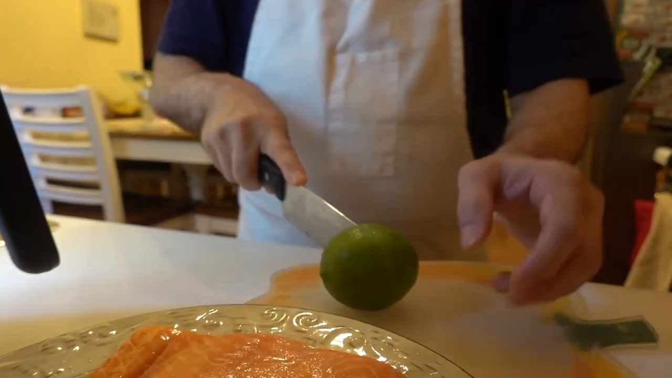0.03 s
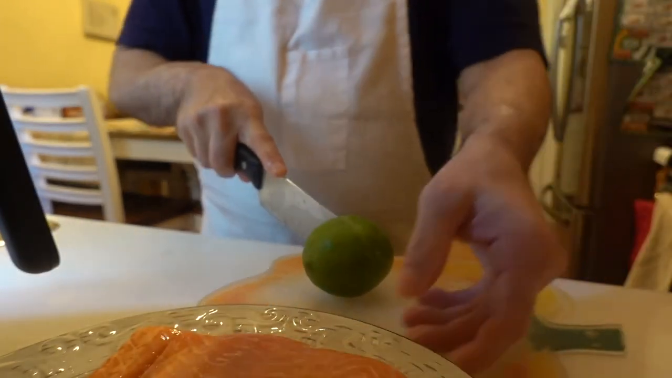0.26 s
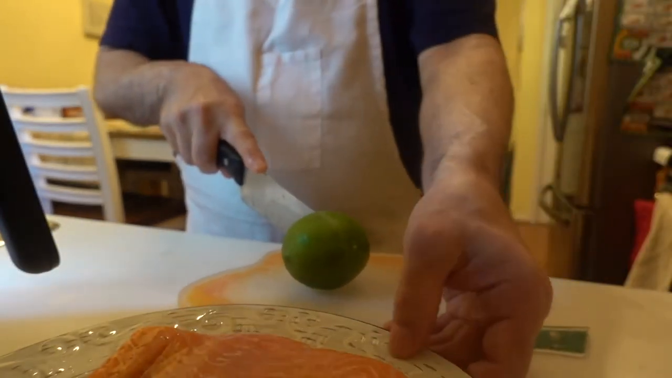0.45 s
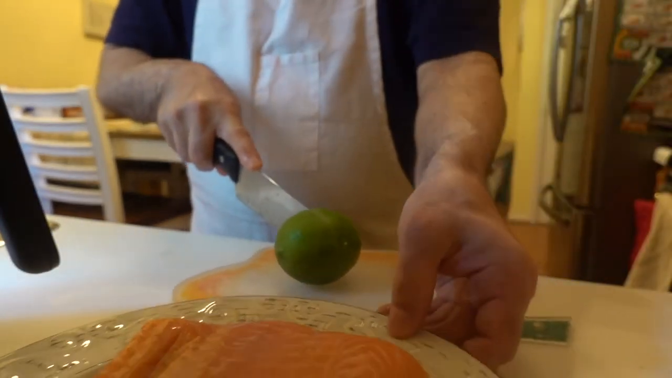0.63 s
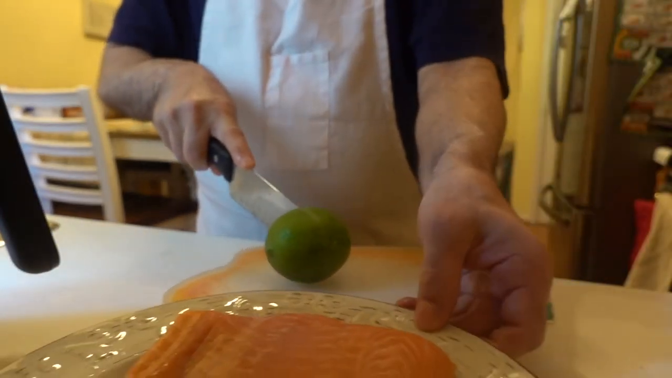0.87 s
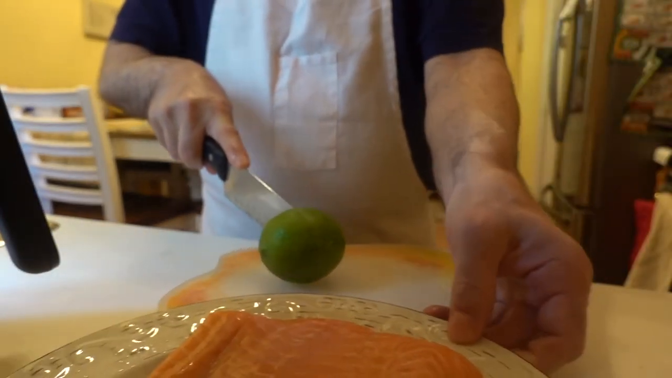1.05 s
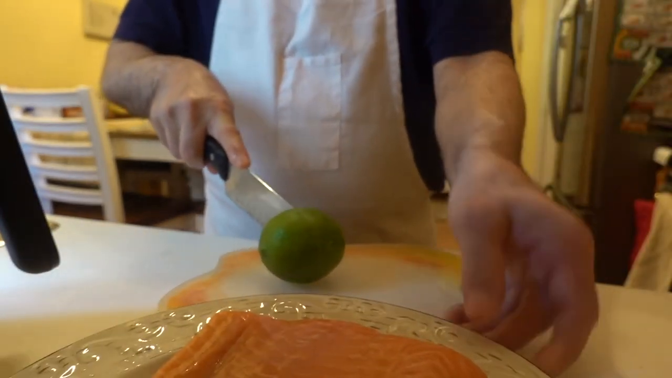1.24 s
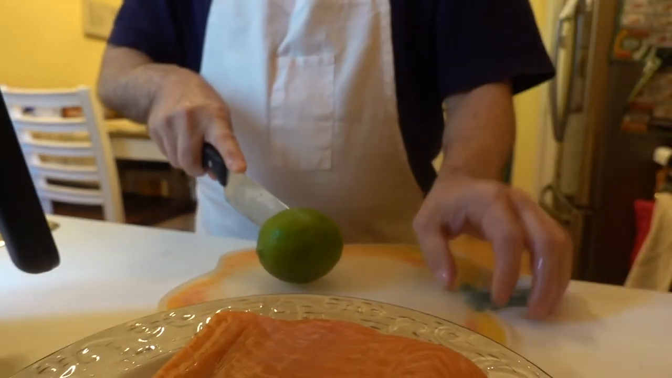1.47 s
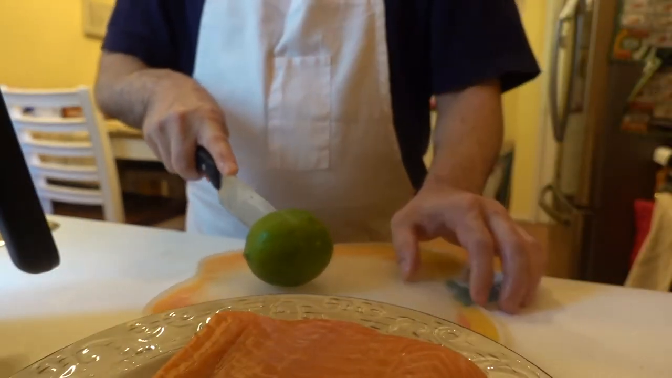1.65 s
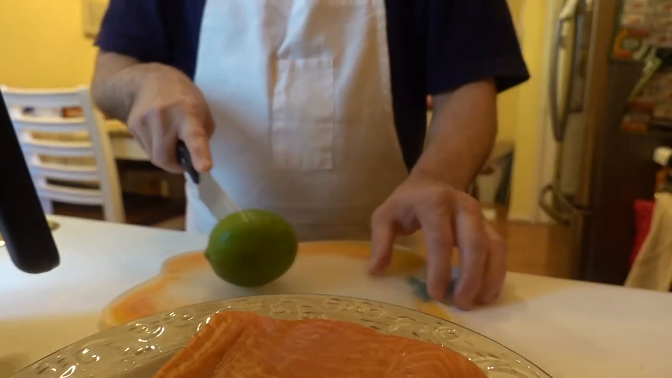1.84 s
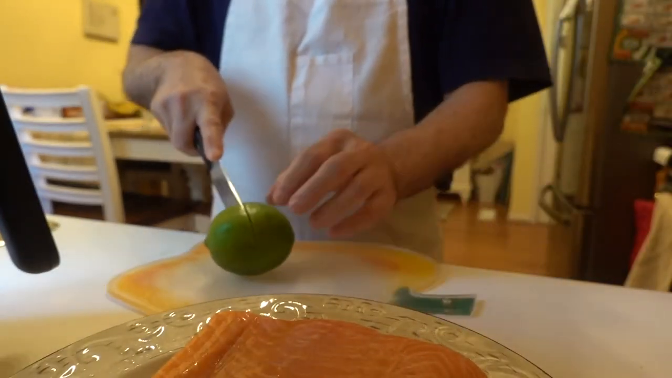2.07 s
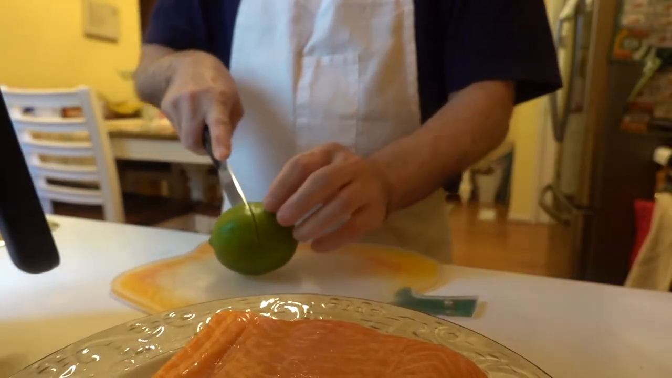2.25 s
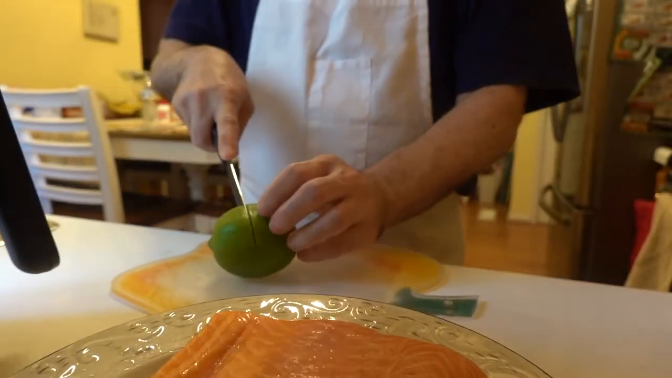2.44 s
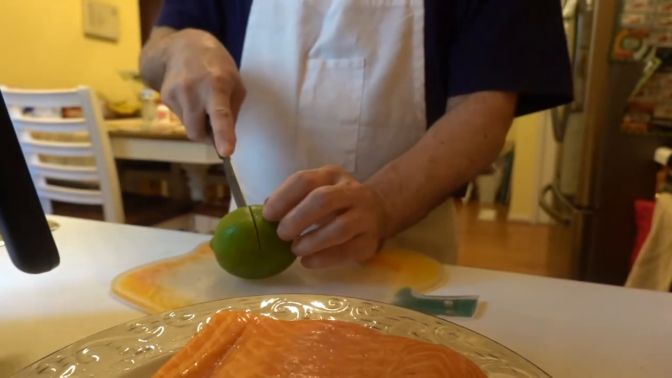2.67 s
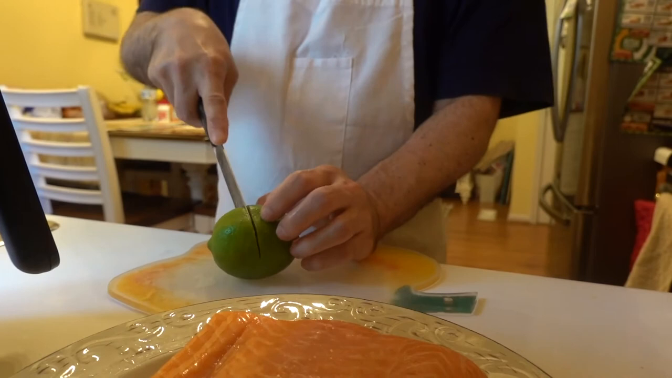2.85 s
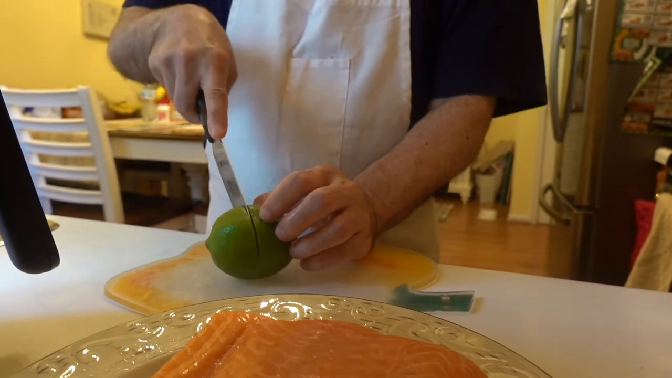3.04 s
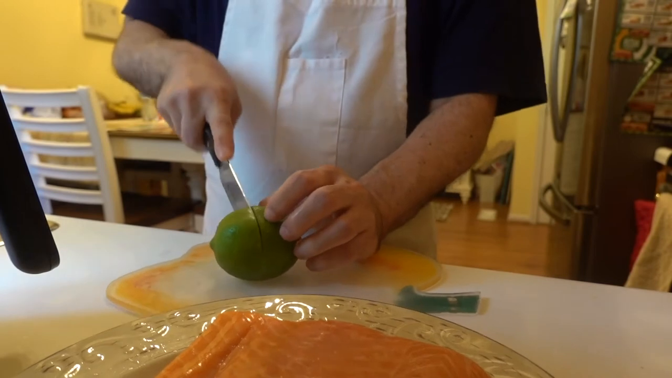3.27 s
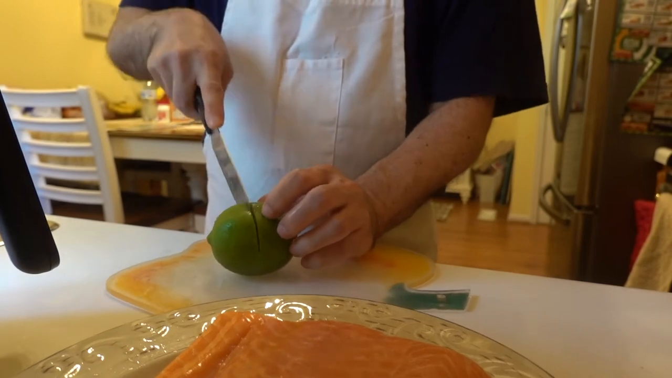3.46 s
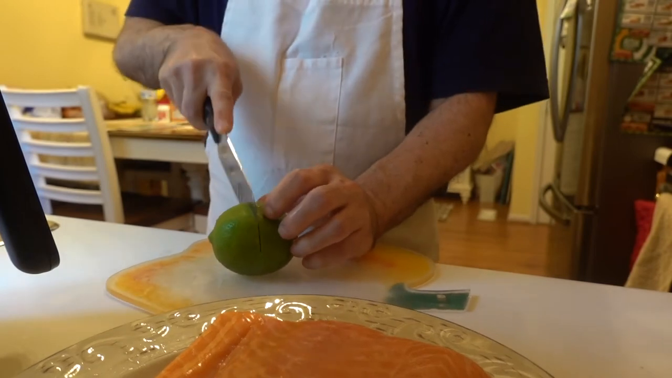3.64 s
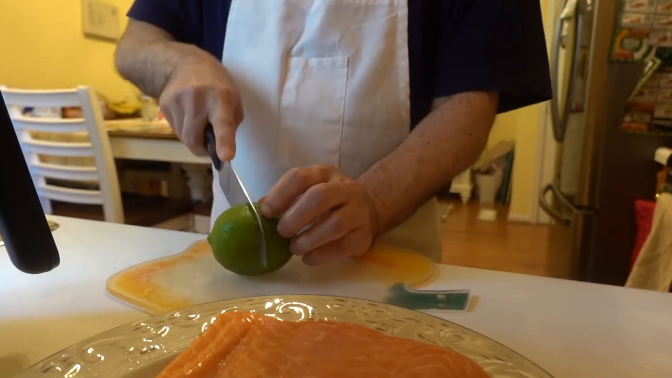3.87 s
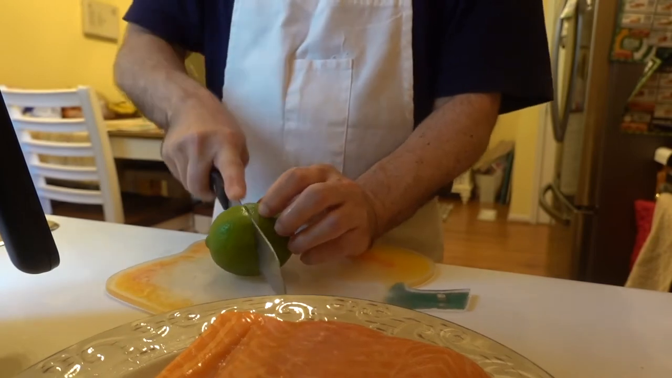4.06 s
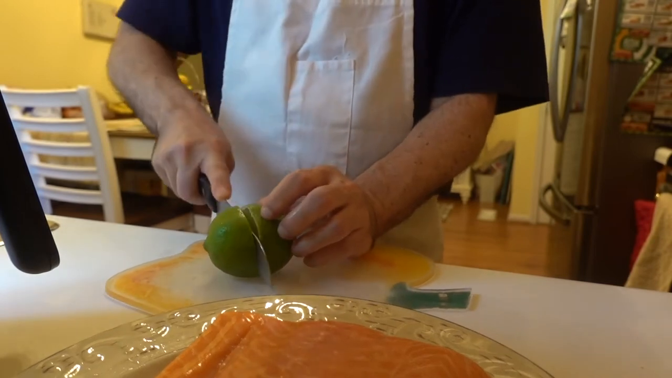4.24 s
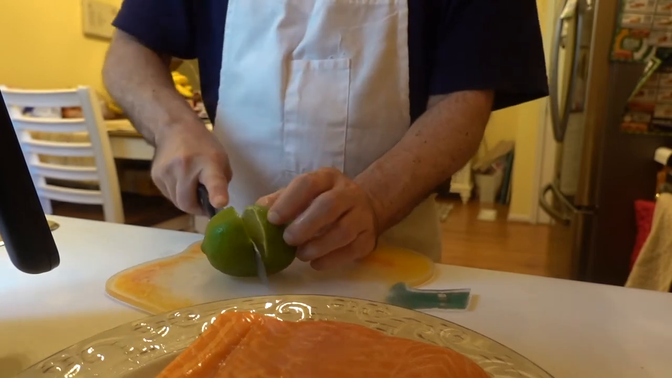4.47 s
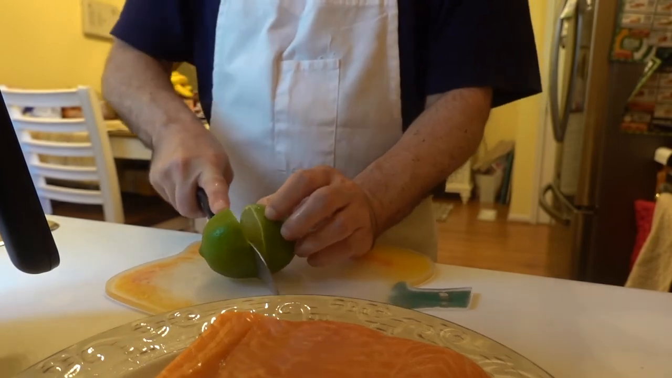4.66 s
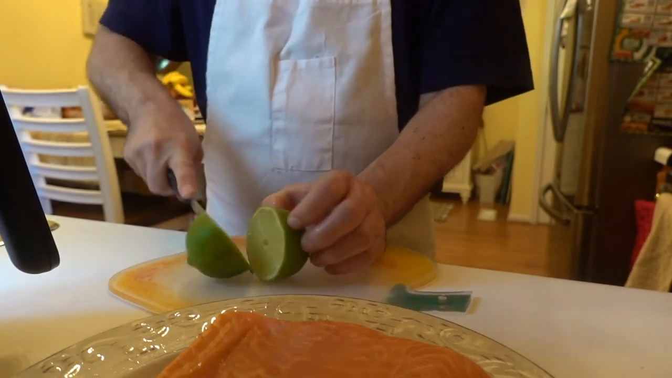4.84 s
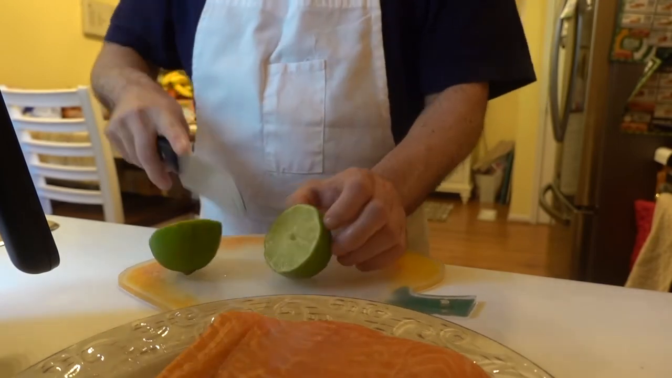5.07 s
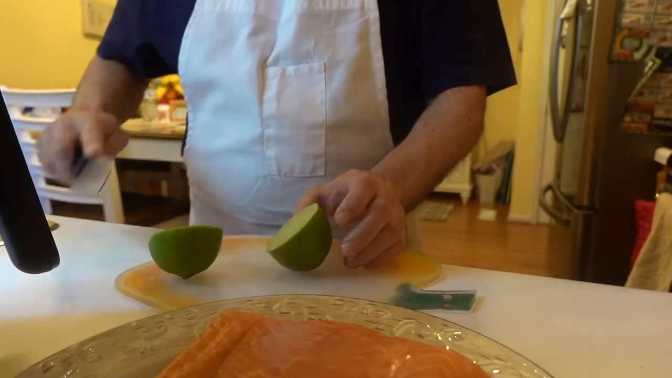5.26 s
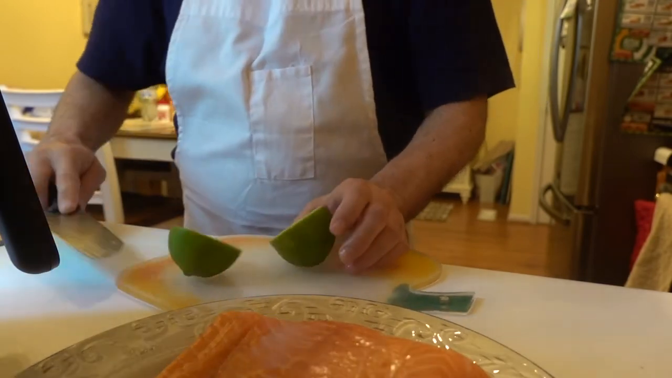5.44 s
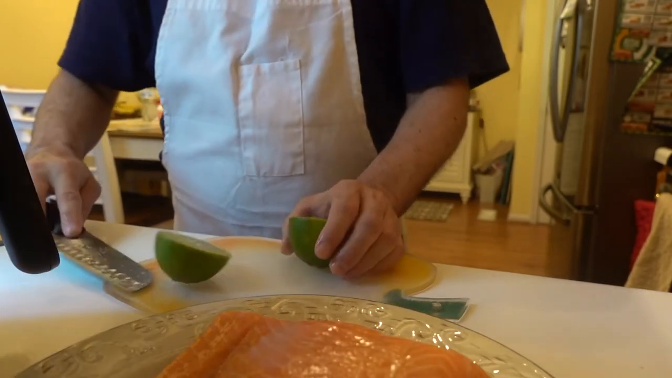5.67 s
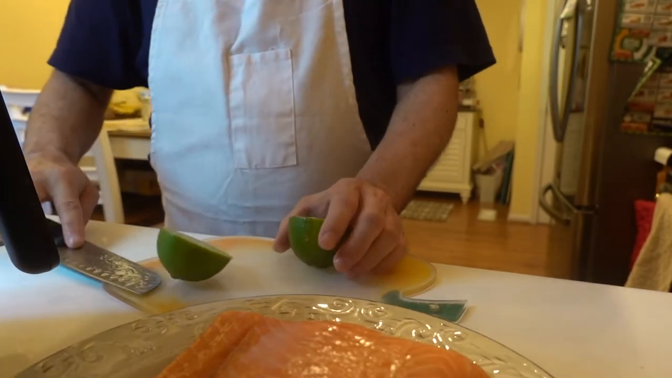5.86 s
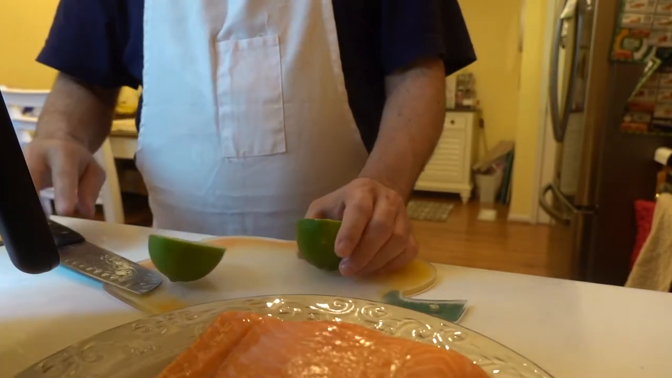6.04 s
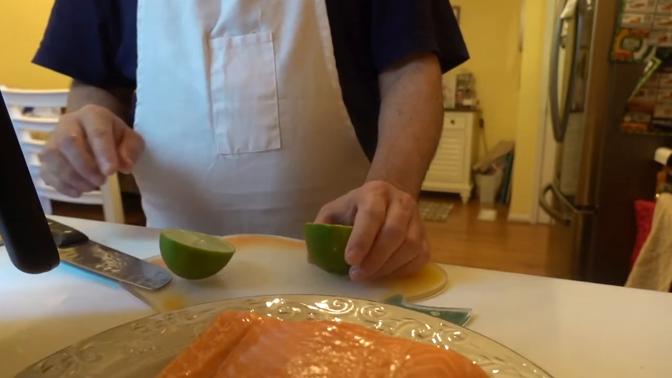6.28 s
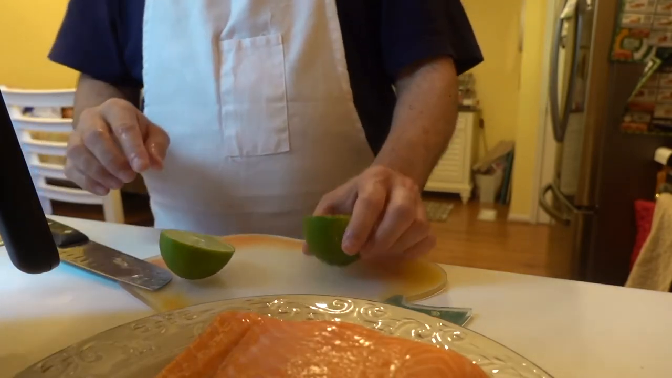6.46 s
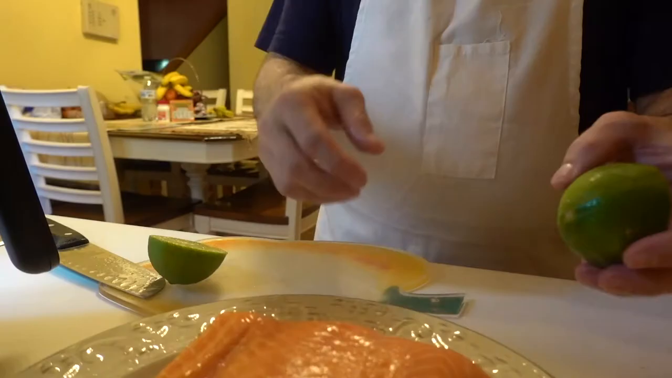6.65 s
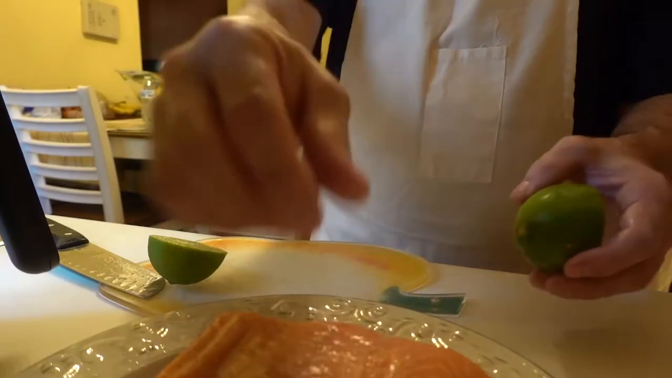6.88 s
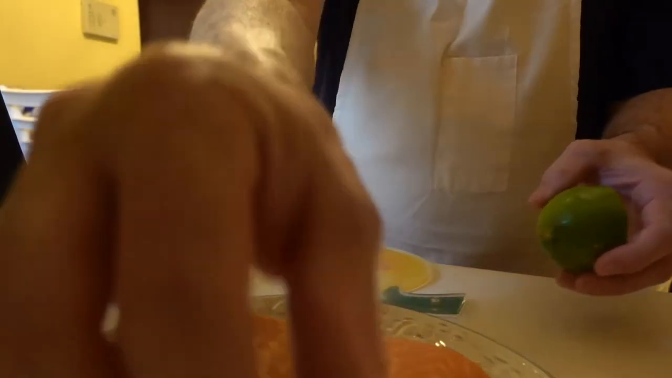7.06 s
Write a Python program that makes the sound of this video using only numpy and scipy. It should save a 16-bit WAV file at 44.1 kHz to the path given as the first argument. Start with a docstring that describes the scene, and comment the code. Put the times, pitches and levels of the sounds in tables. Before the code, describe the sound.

A knife saws through a lime in wet strokes, knocks on a cutting board, then is laid down with a clink and clatter.

```python
"""A small kitchen, where a lime is halved on a cutting board close by, over low rumble and faint hiss.
A plate is nudged along the counter, its resonances driven by stick-slip friction. The knife knocks
through to the board, saws through rind and pulp in a few wet strokes, and is laid down with a steel
clink and a clatter of its handle. Each impact is a brief shock, most with ringing modes after it;
soft bumps and firm knocks sway the counter, and the room adds a short reverberation."""
import sys
import numpy as np
from scipy import signal
from scipy.fft import rfft, irfft, next_fast_len
from scipy.io import wavfile
from scipy.ndimage import map_coordinates

SR = 44100
rng = np.random.default_rng(int(sys.argv[2]) if len(sys.argv) > 2 else 0)


def unload_audio(sound):
    """Save the sound as a 16-bit wav file, at the path given as the first command line argument."""
    columns = np.transpose(np.atleast_2d(sound))
    # keep every value between -1 and 1, then stretch to whole-number steps
    steps = np.round(np.clip(columns, -1, 1) * 32767)
    wavfile.write(sys.argv[1], SR, steps.astype(np.int16))


N = 313551

# firm knocks on board and counter: t/s, level/dB, tilt/(dB/octave), counter sway/dB
FIRM_KNOCKS = [(0.503, -36, 0.5, -30.5), (1.0056, -17.5, 5, -30), (3.353, -9.5, -1, -22),
               (3.3577, -17, 2.5, -54), (3.367, -14, 0.5, -26), (3.854, -41, 2, -31),
               (4.153, -26, 4.5, -30.5), (4.368, -25.5, 2, -29), (4.579, -22.5, 3, -35),
               (5.036, -33, 4.5, -42.5), (5.0485, -27.5, 2, -47)]


def amp(db):
    """Amplitude ratio of a level in decibels."""
    return 10 ** (np.asarray(db) / 20)


def unit(x):
    """Normalisation to an rms of 1."""
    return x / np.sqrt(np.mean(x ** 2) + 1e-20)


def along(points, hz):
    """Interpolation of (f/Hz, value) points on a logarithmic frequency axis."""
    f, values = np.transpose(points)
    return np.interp(np.log(hz + 1), np.log(f), values)


def wobble(rate):
    """Slow random modulation: a spline through `rate` random knots a second."""
    knots = rng.standard_normal(int(N * rate / SR) + 4)
    return map_coordinates(knots, [np.arange(N) * rate / SR])


def warp(pair, position):
    """Time warping: reading a sound at an uneven pace moves its resonances in proportion."""
    return np.array([map_coordinates(channel, [position], mode="wrap") for channel in pair])


def add(track, s, sound):
    """Superposition of a sound on a track, starting at s seconds."""
    part = track[:, round(s * SR):][:, :sound.shape[-1]]
    part += sound[..., :part.shape[1]]


def filtered(x, response):
    """Linear filtering: the spectrum of x is multiplied by a frequency response."""
    n = x.shape[-1]
    padded = 2 * next_fast_len(n // 2 + 4096)
    return irfft(rfft(x, padded) * response(np.fft.rfftfreq(padded, 1 / SR)), padded)[..., :n]


def tone(spectrum, tilt_db=0):
    """Minimum-phase response of a spectrum, tilted by tilt_db per octave from 200 to 3000 Hz."""
    def response(hz):
        octaves = np.log2(np.clip(hz, 200, 3000) / 1000)
        cepstrum = irfft(np.log(amp(along(spectrum, hz) + tilt_db * octaves)))
        half = len(cepstrum) // 2
        cepstrum[1:half] *= 2  # folding the cepstrum makes the response causal
        cepstrum[half + 1:] = 0
        return np.exp(rfft(cepstrum))
    return response


def resonant(peaks):
    """Modal superposition: the response of damped resonators, summed with alternating sign."""
    return lambda f: sum((-1) ** k * amp(db) * 1j * f * width / (f0 * f0 - f * f + 1j * f * width)
                         for k, (f0, width, db) in enumerate(peaks))


def spread(pair):
    """Partial coherence: two independent signals become left and right, most alike in the bass."""
    coherence = [(100, 1), (300, 0.92), (700, 0.64), (1400, 0.71), (3000, 1), (6500, 0.45), (15000, 0.36)]  # likeness of the channels: f/Hz, correlation
    def weights(hz):
        angle = np.arccos(np.clip(along(coherence, hz), -1, 1)) / 2
        return np.array([np.cos(angle), np.sin(angle)])
    mid, side = filtered(pair, weights)
    return np.array([mid + side, mid - side])


def impacts(rows, spectrum, t60, shock, modes=(), ring_db=0):
    """Impulse response: a shock, dense modes dying in t60 seconds, and any given modes ringing on."""
    contact_s = 0.00017  # rise time of a blow
    track, t = np.zeros((2, N)), np.arange(SR // 2) / SR
    for s, db, *tilt in rows:
        tilt_db = sum(tilt)  # zero where the column is absent
        jolt = rng.standard_normal((2, len(t))) * amp(-60 * t / t60)
        jolt[0, 0] += shock
        hit = unit(filtered(spread(jolt), tone(spectrum, tilt_db)))
        ring = np.zeros(len(t))
        for hz, mode_db, mode_t60 in modes:
            start_db = mode_db + tilt_db * np.log2(hz / modes[0][0]) + rng.normal(0, 2)
            ring += amp(start_db - 60 * t / mode_t60) * np.sin(2 * np.pi * (hz * t + rng.random()))
        hit = (hit + amp(ring_db) * unit(ring)) * (1 - np.exp(-t / contact_s))
        add(track, s, amp(db) * np.sqrt(t60 / 20) * hit)  # a shorter blow carries less energy
    return track


def friction(response, slips_per_s, spread_db, flutter_db):
    """Stick-slip excitation: tiny slips of random time and size drive a body as the grip flutters."""
    slips = (rng.random((2, N)) < slips_per_s / SR) * rng.choice([-1, 1], (2, N))
    sizes = amp(spread_db * np.clip(rng.standard_normal((2, N)), -2, 2))
    grip = amp(flutter_db * wobble(110))
    return unit(filtered(spread(slips * sizes * grip), response))


def pushes(rows):
    """Friction follows pressure: each push grips, swells, eases and lets go; a gain per level column."""
    grip_db_per_s, release_db_per_s = 738, 791.5
    t, gain = np.arange(N) / SR, 0
    for hardest, lead_in, run_out, swell_db, *levels in rows:
        start, end = hardest - lead_in, hardest + run_out
        pressure_db = np.interp(t, [start, hardest, end], [-swell_db, 0, -swell_db])
        fade_db = grip_db_per_s * np.maximum(start - t, 0) + release_db_per_s * np.maximum(t - end, 0)
        gain = gain + amp(levels)[:, None] * amp(pressure_db - fade_db)
    return gain


def background():
    """Ambient noise: the modulated low rumble of the room and a person moving, with steady hiss."""
    rumble_levels = [(0.0, -56.5), (0.87, -48), (1.35, -53), (2.932, -54.5), (3.3, -46.5), (3.76, -54.5),
                     (4.22, -45), (6.79, -55.5), (7.11, -53)]  # course of the rumble: t/s, relative level/dB
    rumble_spectrum = [(20, -3), (45, -5), (60, -8), (90, 7.5), (130, -5), (210, -2), (300, -10),
                       (450, -21.5), (1000, -65.5)]  # f/Hz, level/dB
    hiss_spectrum = [(180, -31.5), (300, -23.5), (571, -16), (900, -12.5), (1250, -15), (1700, -18),
                     (2200, -17), (2700, -23), (6000, -25), (10000, -25), (15500, -29)]  # f/Hz, level/dB
    def noise(spectrum):
        return unit(filtered(spread(rng.standard_normal((2, N))), tone(spectrum)))
    rumble_db = np.interp(np.arange(N) / SR, *np.transpose(rumble_levels)) - 0.5
    waver_db = 2 * wobble(5.6)
    return amp(rumble_db + waver_db) * noise(rumble_spectrum) + amp(-65.6) * noise(hiss_spectrum)


def reverberation(x):
    """Diffuse field: each quarter second of sound is convolved with its own decaying noise tail."""
    decay_times = [(100, 0.16), (400, 0.48), (1100, 0.56), (1600, 0.48), (2500, 0.53), (5000, 0.57),
                   (9000, 0.6), (15000, 0.35)]  # reverberation time of the kitchen: f/Hz, T60/s
    build_up_s = 0.017
    wet, step = np.zeros((2, N)), SR // 4
    for start in range(0, N, step):
        hz, t, bands = signal.stft(rng.standard_normal((2, SR * 3 // 4)), SR, nperseg=256)
        decay = amp(-60 * t / along(decay_times, hz)[:, None])
        tail = spread(signal.istft(bands * decay, SR, nperseg=256)[1])
        tail *= np.clip(np.arange(tail.shape[1]) / SR / build_up_s, 0, 1)
        mono = x[:, start:start + step].mean(0)[None]
        add(wet, start / SR, signal.fftconvolve(mono, tail / np.linalg.norm(tail[0]), axes=1))
    return wet


def counter_sway():
    """Damped free vibration: each soft bump and firm knock sets the counter's low modes swinging."""
    soft_bumps = [(0.57, -31.5), (0.764, -25), (1.56, -29), (2.136, -36), (2.648, -44), (3.18, -33.5),
                  (3.212, -31), (4.094, -23.5), (4.118, -29.5), (5.022, -22.5), (5.769, -31),
                  (5.906, -22.5), (6.076, -35), (6.149, -41), (6.95, -36)]  # hands and fruit on the counter: t/s, level/dB
    counter_modes = [(160, 2.5, 0.088), (226, -1, 0.037), (90.5, -6.5, 0.18)]  # f/Hz, level/dB, T60/s
    rise_s = 0.0029
    track, t = np.zeros((2, N)), np.arange(SR // 3) / SR
    sway = sum(amp(db - 60 * t / t60) * np.sin(2 * np.pi * hz * t) for hz, db, t60 in counter_modes)
    sway *= 1 - np.exp(-t / rise_s)
    for s, *_, db in soft_bumps + FIRM_KNOCKS:
        add(track, s, amp(db) * sway)
    return track


def light_taps():
    """Heavily damped impacts: plate, fingers and blade touch dully, with no lasting ring."""
    taps = [(0.741, -20, 2.5), (1.0055, -22.5, -9), (1.277, -40.5, 0.5), (1.337, -42.5, -1.5),
            (1.548, -37.5, 3.5), (2.134, -32.5, -1.5), (2.525, -48, -2.5), (3.212, -30, 1.5),
            (5.659, -24.5, 1.5)]  # t/s, level/dB, tilt/(dB/octave)
    tap_spectrum = [(40, -28), (100, -8), (400, -5), (900, -7), (1600, -5), (2200, 3), (2750, -13),
                    (4200, -17), (5200, -30), (9000, -38), (15000, -52)]  # f/Hz, level/dB
    return impacts(taps, tap_spectrum, t60=0.075, shock=1.5)


def plate_slide():
    """Stick-slip friction: the plate's foot judders along the counter, ringing over coarse grit."""
    # pushes on the plate: hardest t/s, lead-in/s, run-out/s, swell/dB, ring/dB, grit/dB
    shoves = [(0.592, 0.033, 0.04, 6.5, -46, -45.5), (0.765, 0.099, 0.11, 7.5, -34, -36),
              (0.912, 0.0079, 0.039, 3, -37.5, -56), (1.065, 0.037, 0.093, 10, -42, -41.5)]
    plate_modes = [(407, 59, 5.5), (718, 72, 4.5), (1115, 81, 0), (1353, 47, 4.5), (1675, 110, 2),
                   (2180, 78, -1), (2450, 130, -7), (3200, 130, -6), (3730, 130, -13.5), (4150, 153, -8),
                   (5590, 150, -18), (7000, 210, -26), (8480, 220, -25.5)]  # f/Hz, bandwidth/Hz, level/dB
    grit_spectrum = [(150, -4.5), (450, -1), (950, -6), (1550, 1.5), (1950, 0), (2700, -9.5), (4200, -18),
                     (5000, -22.5), (12000, -35)]  # scrape under the foot: f/Hz, level/dB
    drift_s = 0.00019  # depth of the time warp: the resonances wander as the foot shifts
    ring_gain, grit_gain = pushes(shoves)
    ring = friction(resonant(plate_modes), slips_per_s=1800, spread_db=0.5, flutter_db=0)
    ring = warp(ring, np.arange(N) + drift_s * SR * wobble(24.99))
    grit = friction(tone(grit_spectrum), slips_per_s=1200, spread_db=-2, flutter_db=1)
    return ring_gain * ring + grit_gain * grit


def blade_clinks():
    """Lightly damped bending modes: the steel rings on after the flat of the blade lands."""
    landings = [(5.7105, -12, -1), (5.8625, -22.5, -2.5), (5.873, -11.5, -5), (5.8955, -18.5, -2.5)]  # t/s, level/dB, tilt/(dB/octave)
    clink_spectrum = [(50, -24.5), (200, -10.5), (900, -19.5), (1600, -3), (2400, 3), (3300, -4),
                      (5300, -4.5), (7000, -10.5), (10000, -12.5), (15500, -21.5)]  # f/Hz, level/dB
    steel_modes = [(1783, -9.5, 0.14), (2191, -1, 0.18), (2326, -8, 0.31), (2330, 1.5, 0.2),
                   (2880, -8, 0.86), (3960, -9, 1), (4500, -7, 0.4), (5400, -5.5, 0.28), (8200, -19, 0.4)]  # f/Hz, level/dB, T60/s
    return impacts(landings, clink_spectrum, t60=0.039, shock=2, modes=steel_modes, ring_db=-20)


def handle_clatter():
    """Repeated impact: the handle rocks to rest, each contact exciting its modes anew."""
    contacts = [(5.815, -32, 6.5), (5.8665, -7.5, -1), (5.873, -11, -1.5), (5.891, -10, 0.5),
                (5.896, -14, 3), (5.9055, -10, 0), (5.909, -14.5, -1.5)]  # t/s, level/dB, tilt/(dB/octave)
    contact_spectrum = [(40, -51.5), (80, -33), (180, -12), (400, -3), (700, -4.5), (950, -6), (1300, -0.5),
                        (1500, 3), (1750, -5), (2300, -9), (3200, -17.5), (6000, -27), (15000, -45.5)]  # f/Hz, level/dB
    handle_modes = [(345, -6, 0.14), (443, -4, 0.14), (599, -4, 0.17), (725, 2, 0.14), (765, 1, 0.12),
                    (1126, -2, 0.24), (1200, 0, 0.16), (1255, 2, 0.12), (1325, -1, 0.1), (1491, 5, 0.1),
                    (1567, -4, 0.1), (1850, -13, 0.2), (2410, -13, 0.18)]  # f/Hz, level/dB, T60/s
    return impacts(contacts, contact_spectrum, t60=0.043, shock=3.4, modes=handle_modes, ring_db=-1.5)


def board_knocks():
    """Impulsive excitation: firm knocks set the modes of the cutting board ringing."""
    knock_spectrum = [(40, -36), (90, -3), (200, 3.5), (450, 0.5), (600, -4), (780, -6), (950, -10),
                      (1500, -7.5), (2300, -15.5), (3000, -26), (6000, -38), (15000, -43)]  # f/Hz, level/dB
    board_modes = [(160, -6, 0.25), (215.6, -2, 0.18), (303, 3, 0.2), (441, 1, 0.16), (727, -9, 0.25),
                   (790, -12, 0.14), (1061, -18, 0.22), (1195, -16, 0.19), (1373, -9, 0.17),
                   (1505, -16, 0.17), (1895, -20, 0.18), (2196, -7, 0.13)]  # f/Hz, level/dB, T60/s
    knocks = [row[:3] for row in FIRM_KNOCKS]
    return impacts(knocks, knock_spectrum, t60=0.079, shock=3.5, modes=board_modes, ring_db=-2.5)


def blade_clacks():
    """Damped hard impact: the blade breaks through to the board, its ring cut short by the grip; the last two
    clacks, near 5.04 s, are a lime half dropping onto the board."""
    clacks = [(4.1355, -10, 3), (4.158, -23, 4.5), (4.5765, -9.5, -3), (4.708, -17, 6), (4.7125, -9, 1.5),
              (4.8385, -27.5, -5), (5.0405, -18.5, -8), (5.0445, -19, -8)]  # t/s, level/dB, tilt/(dB/octave)
    clack_spectrum = [(40, -28.5), (100, -21.5), (400, -9), (1000, -8.5), (1600, -2), (2200, 4.5),
                      (2800, -13), (3500, -18.5), (6000, -27.5), (15000, -43)]  # f/Hz, level/dB
    gripped_modes = [(1240, 5, 0.05), (1570, -6.5, 0.05), (2040, -6.5, 0.035), (2175, -3, 0.04),
                     (2620, 4, 0.04)]  # the held knife: f/Hz, level/dB, T60/s
    return impacts(clacks, clack_spectrum, t60=0.026, shock=4, modes=gripped_modes, ring_db=-3.5)


def rind_snaps():
    """Sudden release of stress: bursting rind cells radiate short, bright transients."""
    bursts = [(3.856, -44), (4.121, -32.5), (4.1298, -38), (4.267, -32), (4.3525, -30), (4.366, -29.5),
              (4.4954, -35), (4.570, -29), (4.7075, -31.5), (4.7125, -22)]  # t/s, level/dB
    burst_spectrum = [(500, -19), (2500, -10.5), (5000, -4.5), (8000, 1), (11000, 3.5), (15500, -3)]  # f/Hz, level/dB
    return impacts(bursts, burst_spectrum, t60=0.054, shock=1.1)


def sawing():
    """Sliding friction: the edge rasps in rind, drags on the board, presses out juice and squeaks."""
    # knife strokes: hardest t/s, lead-in/s, run-out/s, swell/dB, rasp/dB, drag/dB, juice/dB
    strokes = [(3.347, 0.042, 0.047, -4, -56.5, -54, -53.5), (4.07, 0.14, 0.023, 8, -60, -53, -57.5),
               (4.128, 0.029, 0.0039, 11.5, -34, -33.5, -39), (4.162, 0.024, 0.13, 14, -29.5, -40, -71),
               (4.367, 0.038, 0.052, 12.5, -34.5, -35, -45), (4.497, 0.011, 0.053, 7, -36.5, -38.5, -49.5),
               (4.575, 0.011, 0.015, 6, -26, -33.5, -45), (4.705, 0.056, 0.03, 11, -26, -37, -42.5),
               (4.88, 0.067, 0.041, 6, -35, -41.5, -50.5), (4.95, 0.017, 0.04, 2.5, -50.5, -66, -57)]
    edge_modes = [(1150, 460, -9), (1450, 360, -6), (1980, 340, 2.5), (2166, 324, 3.5), (2410, 230, -2),
                  (2930, 390, -9), (4300, 2000, -20.5)]  # blade resonances before warping: f/Hz, bandwidth/Hz, level/dB
    blade_pitch = [(4.101, 2074), (4.199, 2169), (4.37, 1991), (4.549, 2087), (4.68, 2136), (4.819, 2300),
                   (4.951, 2254)]  # its main ring shifts with depth in the fruit: t/s, f/Hz
    drag_spectrum = [(60, -0.5), (170, -9), (400, -2.5), (750, 3), (1000, -3), (1300, 0), (1800, -12),
                     (3000, -19.5), (8000, -81)]  # edge on the board: f/Hz, level/dB
    juice_spectrum = [(1500, -22.5), (3500, 1.5), (5000, -7.5), (7000, -4.5), (10500, 0), (13000, -8),
                      (15500, -21)]  # fizz of juice: f/Hz, level/dB
    # wet rind on the withdrawing blade: hardest t/s, lead-in/s, run-out/s, swell/dB, level/dB
    squeaks = [(4.844, 0.008, 0.054, 9, -29.5)]
    squeak_modes = [(955, 140, 4.5), (1210, 141, -17)]  # f/Hz, bandwidth/Hz, level/dB
    rasp_gain, drag_gain, juice_gain = pushes(strokes)
    rasp = friction(resonant(edge_modes), slips_per_s=1900, spread_db=1.5, flutter_db=0.35)
    strongest_hz = max(edge_modes, key=lambda mode: mode[-1])[0]
    pitch_ratio = np.interp(np.arange(N) / SR, *np.transpose(blade_pitch)) / strongest_hz
    rasp = warp(rasp, np.cumsum(pitch_ratio))
    drag = friction(tone(drag_spectrum), slips_per_s=1400, spread_db=1.5, flutter_db=1.7)
    juice = friction(tone(juice_spectrum), slips_per_s=3500, spread_db=1.5, flutter_db=-0.5)
    squeak = friction(resonant(squeak_modes), slips_per_s=1300, spread_db=1.5, flutter_db=2)
    return rasp_gain * rasp + drag_gain * drag + juice_gain * juice + pushes(squeaks) * squeak


def scene():
    """Direct and reverberant fields add; a level difference places the work to the left."""
    left_excess = [(150, 0), (380, 1.5), (700, 1), (1300, 4), (2400, 3), (4400, 6), (8000, 10), (15000, 8)]  # left channel over right: f/Hz, level/dB
    left_lag_s = 0.000045  # the left channel is this much later
    # each source with its share sent to the room/dB
    sources = [(board_knocks(), -8), (blade_clacks(), -16.5), (light_taps(), -4.5),
               (rind_snaps(), -10), (blade_clinks(), -5), (handle_clatter(), -8.5),
               (counter_sway(), -4), (plate_slide(), -3), (sawing(), -9)]
    direct = sum(sound for sound, _ in sources)
    room = reverberation(sum(amp(db) * sound for sound, db in sources))
    side = np.array([[0.5], [-0.5]])
    def placement(hz):
        return amp(side * along(left_excess, hz)) * np.exp(-2j * np.pi * hz * side * left_lag_s)
    return filtered(direct + room, placement) + background()


def record(dry):
    """Band limiting: a first-order high-pass thins the deep bass, a steep low-pass ends the treble."""
    low_cut_hz, top_hz = 45, 15900
    return filtered(dry, lambda hz: 1j * hz / (low_cut_hz + 1j * hz) / (1 + (hz / top_hz) ** 200))


dry = scene()
out = record(dry)
unload_audio(out)
```